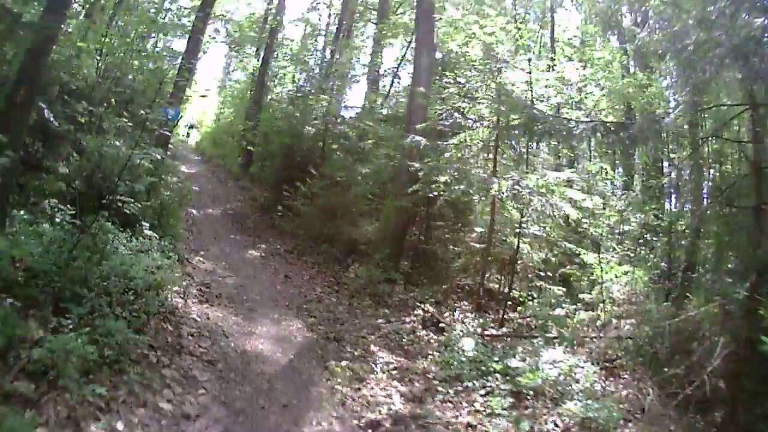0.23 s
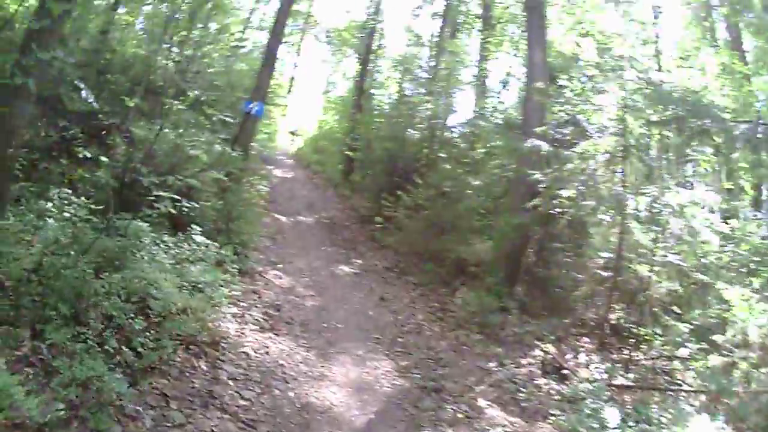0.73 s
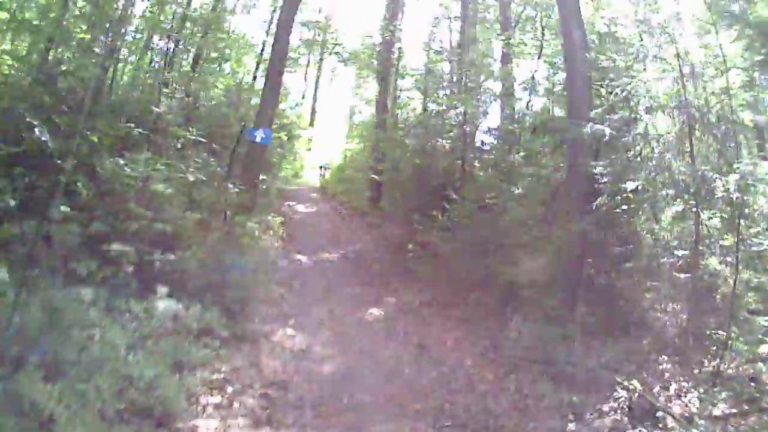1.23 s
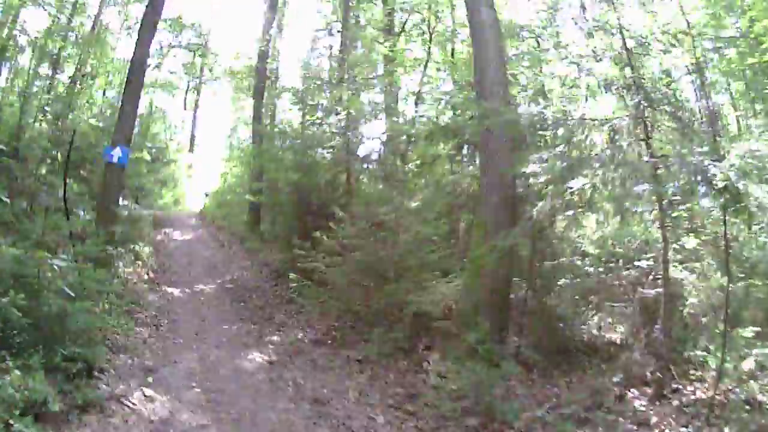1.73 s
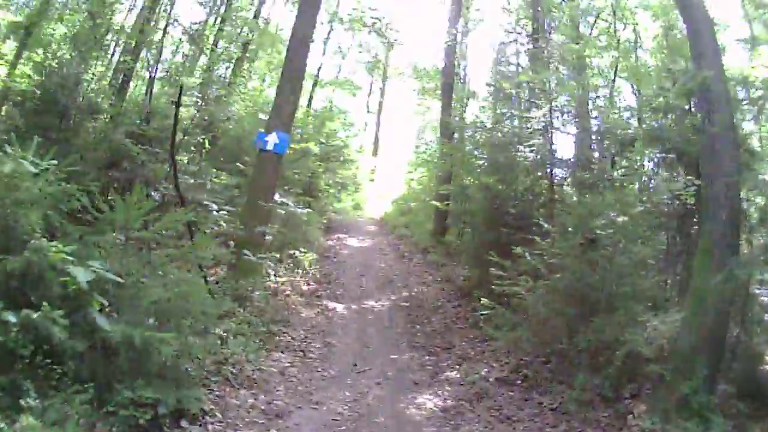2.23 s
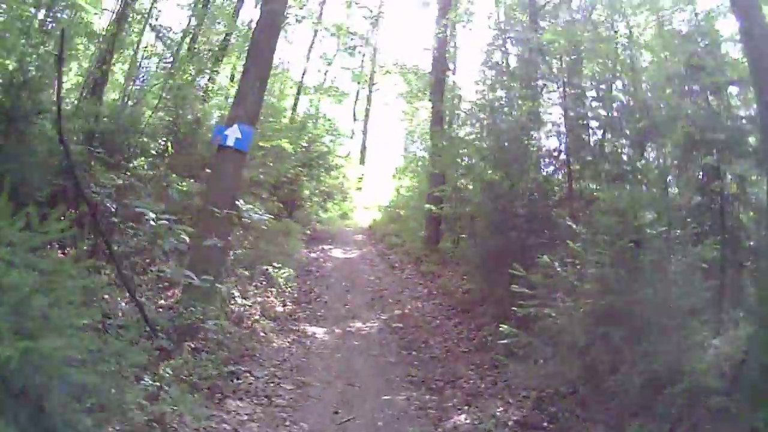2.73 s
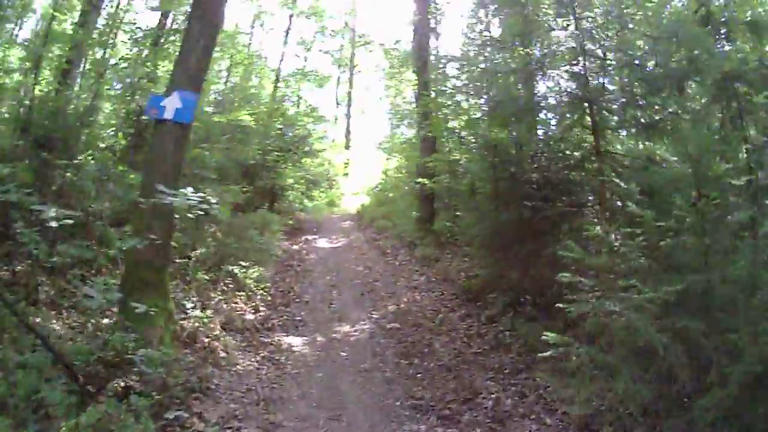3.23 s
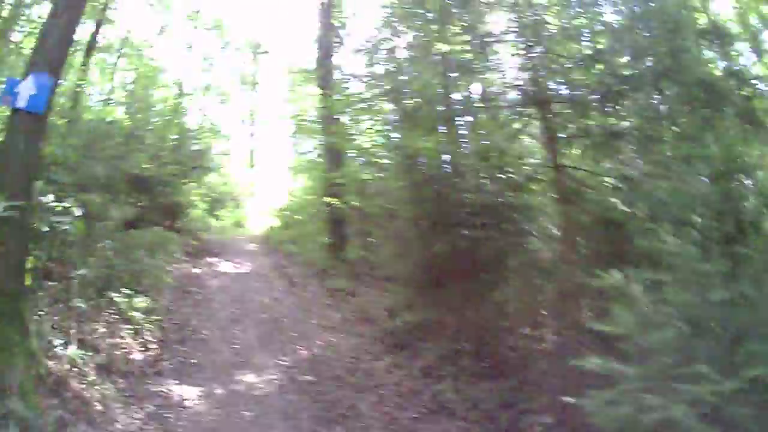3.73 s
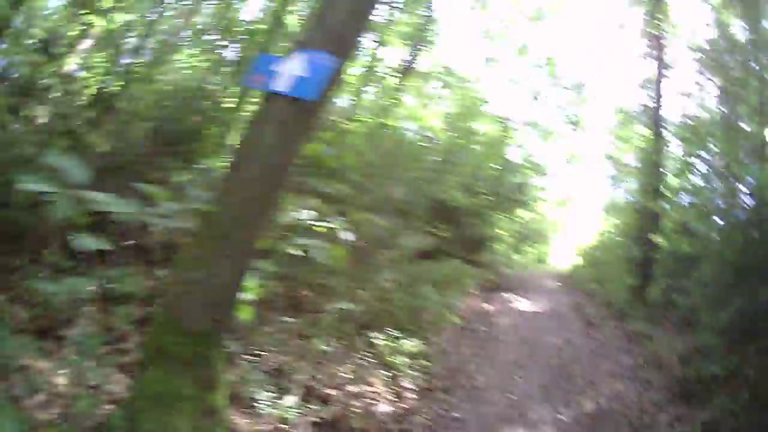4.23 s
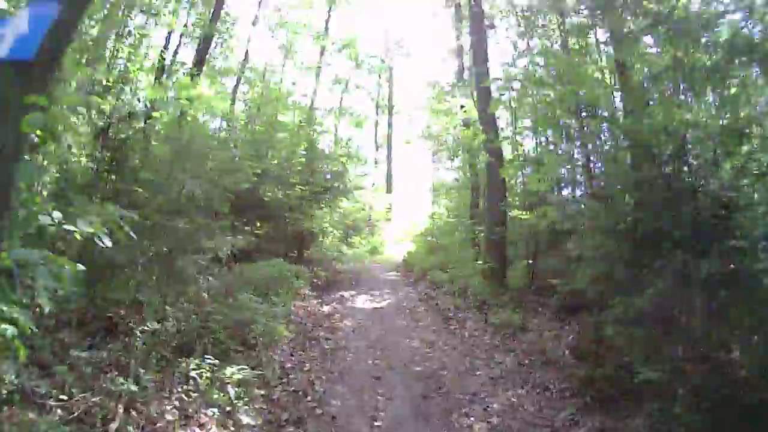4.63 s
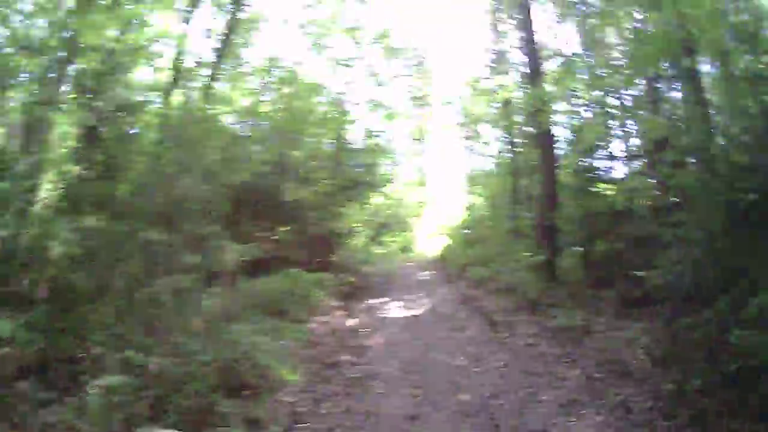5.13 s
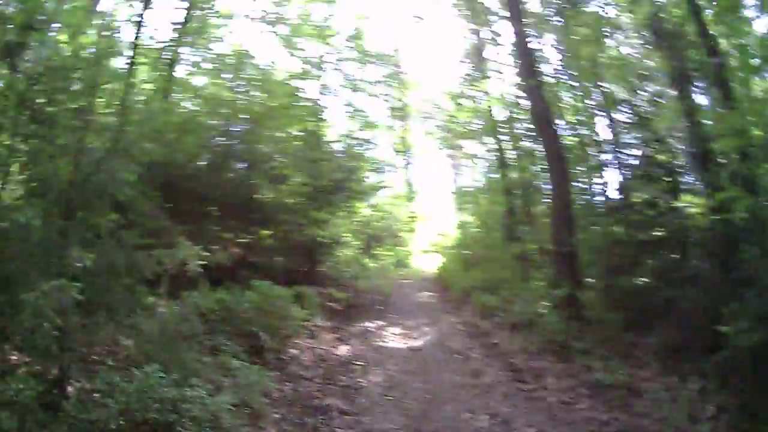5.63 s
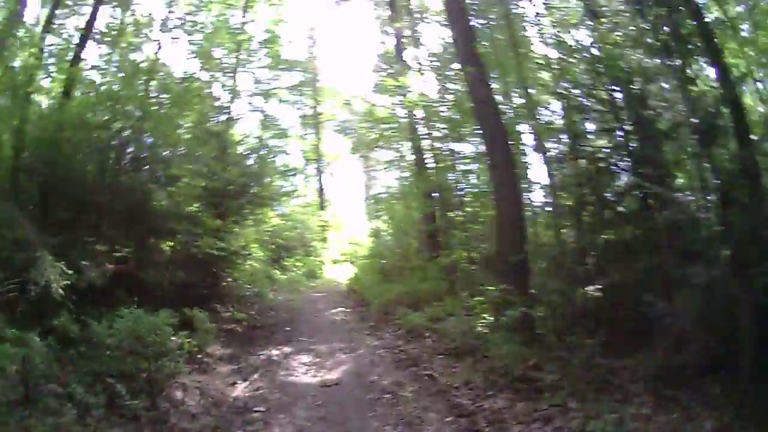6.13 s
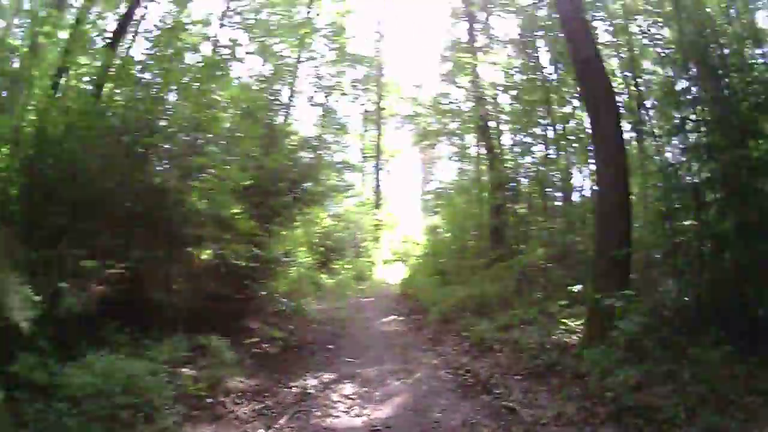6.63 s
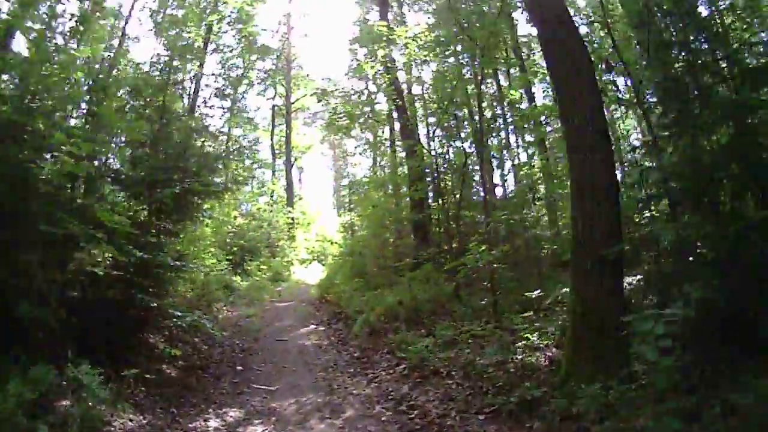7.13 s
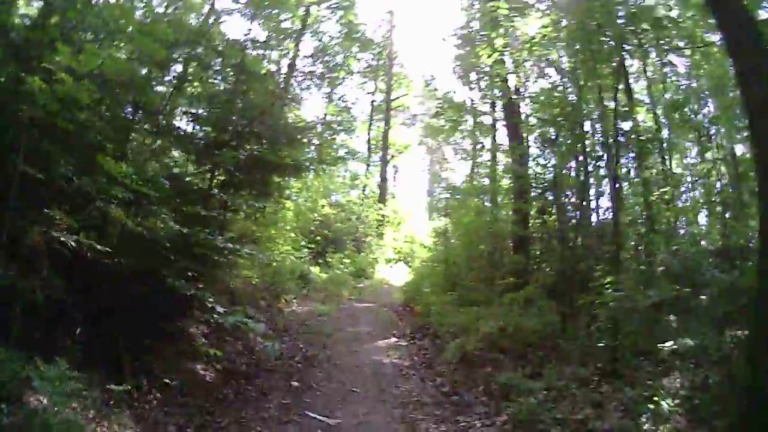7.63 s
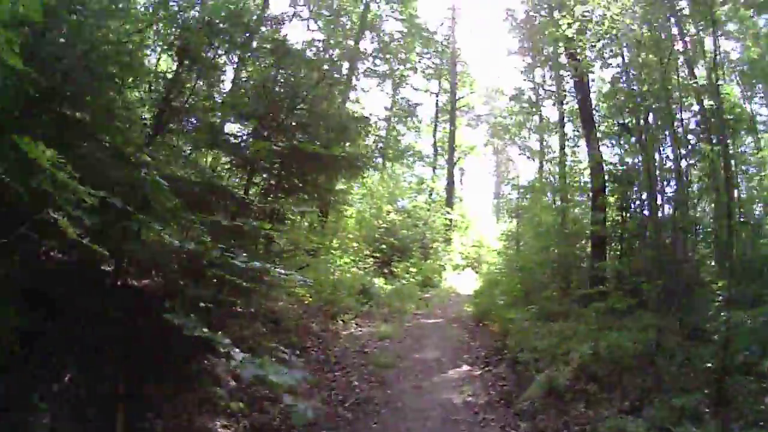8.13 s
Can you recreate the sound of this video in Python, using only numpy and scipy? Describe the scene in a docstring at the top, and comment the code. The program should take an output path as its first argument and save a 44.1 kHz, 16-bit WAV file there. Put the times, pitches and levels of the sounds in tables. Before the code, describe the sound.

Hollow, dry plastic knocks bounce in irregular clusters over a quiet bed of tyres drumming and crunching on forest dirt, with faint chain ticks and deep shudder. Midway the trail roughens: the handlebar thuds on one low note, the chain clacks against the frame and the tread whirs. Later the rattling thins out. The sound is close and dull inside a closed case on the bike, clipping on loud hits.

```python
"""A loose camera rattles in its mount at each bump, as a mountain bike rolls along a forest trail.
Each knock makes the camera case ring with short dying tones, then it bounces and knocks again.
On the roughest stretch the handlebar thuds on one low note, the chain slaps the frame and the tread hums.
Underneath, filtered noise makes the tyres drum and crunch, chain links tick and the bike shudders.
The closed case muffles it all, and the loudest blows overload the microphone."""
import sys
import numpy as np
from scipy import signal
from scipy.fft import rfft, irfft
from scipy.io import wavfile
from scipy.ndimage import uniform_filter1d

SR = 44100
rng = np.random.default_rng(int(sys.argv[2]) if len(sys.argv) > 2 else 0)


def write(x):
    x = np.atleast_2d(x).T
    wavfile.write(sys.argv[1], SR, np.round(np.clip(x, -1, 1) * 32767).astype(np.int16))


N = 369999
T = np.arange(N) / SR  # time of every sample, in seconds

# All table levels are relative: each source sets its own loudness further on.
# Bumps that set the camera chattering:
# (time [s], strength [dB], hardness as a tilt [dB per octave], loss per bounce [dB])
BUMPS = [(0.0153, -13, -4.5, 7.5), (0.1664, 0, 1.35, 9), (.2745, -14.5, 1, 0), (0.4907, -4.5, 0, 6),
         (.5661, -7.5, -0.5, 3), (0.597, -6.5, -0.5, 10.5), (0.9748, -9, -.5, 3), (1.0313, -10, -0.1, 3),
         (1.1692, -13.5, -.5, 3), (1.2167, -9.5, -1.5, 2.5), (1.2607, -8, -0.5, 3.5),
         (1.4066, -9.5, -0.5, 2), (1.4966, -5.5, 1, 4.5), (1.5987, 1, 3.5, 4), (1.6238, 0, 1, 10),
         (1.6525, -7.5, -0.5, 3), (1.7759, -.5, 1, 9), (1.8213, -12, 2, 13), (1.9301, -10, 1, 0.5),
         (2.255, -9.5, -1.7, 8.5), (2.572, -4, -1, 8), (3.0803, -8.5, 2.1, 3), (3.4767, -9.5, 0.5, 2.5),
         (3.5246, -7, 0.5, 12), (3.6353, -6, 2.7, 16), (4.3254, -4, 0.5, 9.5), (4.3606, -3, 3, 14),
         (4.3776, -3, 2, 5), (4.4353, -4, -0.5, 17), (4.458, -10, -2.5, 3.5), (4.522, -3.5, 1, 7),
         (4.8609, -9.5, -2, 8), (4.9589, -9, -1.25, 8.5), (5.2609, -8.5, 0, 5), (5.477, -13.5, -4.5, 9),
         (5.5223, -3, 0.5, 3.5), (5.5861, -6, 1, 4), (5.9794, -4, 0.14, 14), (6.0925, -11.5, -2.5, 7.5),
         (6.202, -13, -1.5, 9.5), (6.2429, -12, 1.5, 9.5), (6.8245, -11.5, 1, 14), (7.357, -19, -1.5, 10),
         (7.5529, -12.5, -1, 12), (7.5926, -3.5, 1.5, 10), (7.647, -12, -3, 6), (7.8165, -11, 0, 2.5),
         (8.3005, -11, -.5, 9.5)]
# Tones of the camera case: (pitch [Hz], level [dB], time to fade by 60 dB [s])
CASE_TONES = [(192, -15.5, 0.067), (272, 2, 0.028), (378.6, 0, 0.026), (629, -5, 0.027), (777, -4, 0.019),
              (915, -14.5, 0.022), (1437, -10, 0.03), (1649, -13.5, 0.025), (1980, -32, 0.026),
              (2725, -25.5, 0.02), (3310, -26.5, 0.017)]
# Jolts that shake the handlebar: (time [s], level [dB], rise time constant [s])
THUDS = [(2.864, -12.5, .003), (3.065, -8, .006), (3.0866, 3, 0.0072), (3.391, -7, .007),
         (3.4414, -2.5, .003), (3.5965, 12.5, 0.0028), (3.7503, 7.5, 0.0084), (3.9603, 7, 0.0053),
         (4.134, -6.5, .006), (4.155, -5, 0.0074), (4.3262, 1.5, 0.00084), (4.379, 1.5, 0.0035)]
# The chain slapping the frame: (time [s], level [dB], centre pitch of the blow [Hz])
CHAIN_SLAPS = [(.3735, -17.5, 1060), (.466, -18.5, 970), (1.958, -10.5, 900), (2.0115, -10.5, 1000),
               (2.6825, -15.5, 1470), (2.7872, 5, 1760), (3.1252, -5.5, 1520), (3.229, -14, 1300),
               (3.265, -22, 2200), (3.3172, 2, 1800), (3.4426, -8, 636), (3.5522, 6.5, 1390),
               (3.5605, -3.5, 1110), (3.5955, 6, 1200), (3.6145, 2, 910), (3.7495, 1, 830),
               (3.7895, -6, 583), (3.9565, 2, 850), (4.1275, -6.5, 1200), (4.1525, -10, 1320),
               (4.665, -7.5, 850), (4.847, -18, 1170), (6.4625, -18, 1207)]
# Tones of the bike frame: (pitch [Hz], level [dB], time to fade by 60 dB [s])
FRAME_TONES = [(440, -2, 0.083), (626, 2.5, .035), (715, 5, 0.047), (925, -2, 0.035), (1156, -5.5, 0.035),
               (1358, -2, 0.046), (1445, 1, 0.02), (1640, -14, 0.025), (2126, -7, 0.028),
               (2550, -9, 0.0063), (2734, -4.5, 0.033), (3250, -21.5, 0.034)]
# Thin metal parts that sing on: (time [s], pitch [Hz], level [dB], time to fade by 60 dB [s])
METAL_TONES = [(2.79, 3560, -54, 0.37), (3.125, 2840, -14, 0.029), (3.556, 3500, -46, 0.27),
               (3.6, 795, -19, 0.41), (3.601, 1298, -13.5, 0.3), (4.125, 2720, -31, 0.12)]
# Tyre knobs whirring under load, one list a stretch: (time [s], knob rate [per s], level [dB])
WHIRRS = [
    [(2.93, 113, -34.5), (3.0, 124, -29), (3.06, 146, -37), (3.11, 176, -16)],
    [(3.62, 160, -15), (3.7, 151, -25.5), (3.82, 138, -29), (3.93, 129, -25.5), (4.02, 100, -29),
     (4.1, 110, -48.5)],
]
# Hum tones of the tread: (multiple of the knob rate [-], level [dB])
KNOB_TONES = [(2, -10), (3, 2), (4, 5), (5, 1.5), (6, 2), (11, -16.5)]
# Tyres on dirt: (time [s], low drumming level [dB], gritty treble level [dB])
GROUND = [(0, -34, -43), (1.17, -39.5, -39), (1.6, -28.5, -38), (2.13, -39.5, -42), (2.9, -32.5, -39.5),
          (3.03, -24, -30.5), (3.15, -34, -39), (3.38, -29.5, -41), (3.66, -26, -32), (4.0, -31, -34.5),
          (4.28, -37, -41), (4.4, -26, -35.5), (4.7, -35.5, -41.5), (5.6, -30, -37), (6.65, -35.5, -40.5),
          (7.55, -29, -37), (7.7, -33, -41), (8.37, -33.5, -39)]
# Tone colour of the tyre noise: (pitch [Hz], level [dB per Hz])
TYRE_COLOUR = [(20, -9.5), (38, -8), (66, -15), (110, -2.5), (180, 3.5), (260, 1), (420, -6), (510, -10.5),
               (700, -7.5), (950, -19.5), (1600, -27.5), (1900, -40), (3400, -38), (4300, -46)]
# Resonances of the bike that carry tyre noise: (pitch [Hz], width [Hz], boost [dB])
BIKE_RESONANCES = [(246.5, 16, 12), (640, 91, 4), (1424.5, 90, 21), (2120, 43, 16.5), (2760, 140, 10)]

BOUNCE_S, BOUNCE_SCATTER = .0138, .07  # time between rebounds [s], and its spread [octaves]
SETTLED_DB = -15.5  # after the first rebound, weaker ones no longer lift the case
# Small bumps between the large ones; hardness in dB per octave
PEBBLES_PER_S, PEBBLE_DB, PEBBLE_SPREAD_DB, PEBBLE_HARDNESS = 5, -22.5, 4, -1.4
BAR_HZ, BAR_T60 = 243.2, 0.11  # the handlebar's note, and its time to fade by 60 dB [s]
LINKS_PER_S = 30
BUMP_DRUM_DB = -19.5  # extra drumming relative to the shaking
EDGE_HZ = 16300  # upper limit of the recorded band


def mount():
    """Every knock rings the loose case; harder contact brings out the higher tones."""
    out = np.zeros(N)
    hz = np.array(CASE_TONES)[:, 0]
    rise = 0.00078 + 0.097 / hz  # low tones take longer to get going
    knocks = [knock for bump in BUMPS for knock in chatter(*bump)]
    knocks += pebbles()
    for s, db, hardness in knocks:
        tilt_db = hardness * np.log2(hz / 600)
        knock = ring(CASE_TONES, tilt_db, rise, detune=0.028, scatter_db=2.07, size=2400)
        add(out, s, gain_of(db) * knock)
    return passed(gain_of(0.69) * out, 88, "high", order=2)


def chatter(s, db, hardness, loss_db, lead_db=-19, soften=0.58):
    """One bump: the case touches, knocks, then rebounds ever duller; gives (s, dB, hardness) rows."""
    gaps = BOUNCE_S * 2 ** (BOUNCE_SCATTER * rng.standard_normal(size=8))
    knocks = [(s - gaps[0], db + lead_db, hardness), (s, db, hardness)]
    for k, delay in enumerate(np.cumsum(gaps[1:]), 1):
        rebound_db = db - k * loss_db
        if k == 1 or rebound_db > SETTLED_DB:
            knocks.append((s + delay, rebound_db, hardness - k * soften))
    return knocks


def pebbles():
    """Small bumps knock the case once each, at uneven moments; gives (s, dB, hardness) rows."""
    slots = np.arange(0, N / SR, 1 / PEBBLES_PER_S)
    place, strength, colour = rng.standard_normal((len(slots), 3)).T
    times = abs(slots + .5 * place / PEBBLES_PER_S)
    levels = PEBBLE_DB + PEBBLE_SPREAD_DB * strength
    return list(zip(times, levels, PEBBLE_HARDNESS + 2 * colour))


def handlebar():
    """A jolt sets the bar swinging at its one low note."""
    out = np.zeros(N)
    for s, db, rise in THUDS:
        note = [(BAR_HZ, db, BAR_T60)]
        add(out, s, ring(note, 0, rise=rise, detune=0.006, scatter_db=1.77, size=9000))
    return gain_of(-1.0) * out


def chain_slap(choke_db_per_s=700):
    """Blows ring the frame, damped by the chain lying on it; a few thin metal parts sing on."""
    out = np.zeros(N)
    for s, db, centre_hz in CHAIN_SLAPS:
        blow = frame_blow(centre_hz, focus_db=8, rise=0.0012)
        add(out, s, blow * gain_of(db + 2 - choke_db_per_s * T[:len(blow)]))
    for s, *tone in METAL_TONES:
        add(out, s, ring([tone], 0, rise=0.003, detune=0, scatter_db=1, size=20000))
    return out


def frame_blow(centre_hz, focus_db, rise):
    """The frame is struck once, its tones favoured near the blow's centre pitch; peak 1."""
    octaves = np.log2(np.array(FRAME_TONES)[:, 0] / centre_hz)
    focus = -focus_db * octaves ** 2
    blow = ring(FRAME_TONES, focus, rise=rise, detune=0.016, scatter_db=3.5, size=3000)
    return blow / abs(blow).max()


def whirr(waver=0.033, flutter_db=6.0):
    """The tread hums on several multiples of the knob rate, wavering in pitch and strength."""
    out = np.zeros(N)
    for stretch in WHIRRS:
        s, knob_hz, db = np.transpose(stretch)
        t = np.arange(s[0], s[-1], 1 / SR)
        rate = np.interp(t, s, knob_hz) * (1 + waver * wander(size=500)[:len(t)])
        knobs_passed = np.cumsum(rate) / SR
        hum = np.zeros(len(t))
        for multiple, level in KNOB_TONES:
            strength = gain_of(level + flutter_db * wander(size=1200)[:len(t)])
            hum += strength * np.sin(2 * np.pi * (multiple * knobs_passed + rng.random()))
        fade = signal.windows.tukey(len(t), .1)  # soft start and end
        add(out, s[0], evened(hum) * gain_of(np.interp(t, s, db) + 1.0) * fade)
    return out


def rolling(shake, stones_per_s=220, spread_db=3, flutter_db=2.5, grit_flutter_db=2, ring_flutter_db=3.5):
    """Stones and fine crunch come through the bike, whose resonances each swell and fade."""
    hits = (rng.random(N) < stones_per_s / SR) * rng.choice([-1, 1], N)
    stones = hits * gain_of(spread_db * np.minimum(rng.exponential(1, N), 3))
    crunch = gain_of(-1) * rng.standard_normal(N)
    hz, db = np.transpose(TYRE_COLOUR)
    pitches = np.fft.rfftfreq(N, 1 / SR)
    colour = gain_of(np.interp(np.log(pitches + 1), np.log(hz), db))
    sound = irfft(rfft(evened(stones) + crunch) * colour, N)
    for hz, width, boost_db in BIKE_RESONANCES:
        swell = evened(gain_of(ring_flutter_db * np.minimum(wander(size=1500), 1.5)))
        resonance = signal.lfilter(*signal.iirpeak(hz, hz / width, SR), sound)
        sound = sound + (gain_of(boost_db) - 1) * swell * resonance
    drum_db, grit_db = ground(T)
    drumming = evened(passed(sound, 390, "low", order=3))
    drumming = drumming * (gain_of(drum_db) + gain_of(BUMP_DRUM_DB) * shake)
    grit = evened(passed(sound, 520, "high", order=3))
    grit = grit * gain_of(grit_db + grit_flutter_db * wander(size=900))
    return (drumming + grit) * gain_of(flutter_db * wander(size=2400) + 2.0)


def ground(s):
    """The dirt sets how strong the low drumming and the grit are at time s, in relative dB."""
    when, drum_db, grit_db = np.transpose(GROUND)
    return np.interp(s, when, drum_db), np.interp(s, when, grit_db)


def chain_links(spread_db=4.5, centre_hz=1330, over_bed_db=3.0):
    """Links slide softly onto the sprocket in a loose train, each ticking through the frame."""
    out = np.zeros(N)
    links = np.arange(1, N / SR * LINKS_PER_S)
    slack, strength, colour = rng.standard_normal((len(links), 3)).T
    times = (links + .2 * slack) / LINKS_PER_S
    grit_db = ground(times)[1]  # the ticks follow the level of the grit
    levels = grit_db + over_bed_db + spread_db * np.minimum(strength, 2)
    pitches = centre_hz * 2 ** (.5 * colour)
    for s, db, hz in zip(times, levels, pitches):
        add(out, s, gain_of(db) * frame_blow(hz, focus_db=7.5, rise=0.0027))
    return out


def rumble(shake):
    """The whole bike shudders at a very low pitch, more when the bumps shake it."""
    noise = passed(rng.standard_normal(N), 46, "low", order=4)
    deep = evened(passed(noise, 30, "high", order=2))
    return deep * (gain_of(-48) + gain_of(-23.5) * shake)


def ring(tones, weight_db, rise, detune, scatter_db, size):
    """One blow: dying tones, each a little different in pitch and strength every time."""
    hz, db, t60 = np.transpose(tones)[:, :, None]
    pitch, strength = rng.standard_normal((2, len(hz), 1))
    t = np.arange(size) / SR
    weight = np.reshape(weight_db, (-1, 1))
    level = gain_of(db + weight + scatter_db * strength - 60 * t / t60)
    onset = 1 - np.exp(-t / np.reshape(rise, (-1, 1)))
    waves = np.sin(2 * np.pi * hz * (1 + detune * pitch) * t)
    return (level * onset * waves).sum(0)


def wander(size):
    """Smooth chance of rms 1 that changes over about size samples."""
    return evened(signal.oaconvolve(rng.standard_normal(N), np.hanning(size), "same"))


def passed(x, hz, kind, order):
    """Keeps what lies below ("low") or above ("high") a pitch."""
    sections = signal.butter(order, min(hz, SR / 2.1), kind, fs=SR, output="sos")
    return signal.sosfilt(sections, x)


def evened(x):
    """Scales to rms 1, so that a later gain sets the loudness."""
    return x / np.sqrt(np.mean(x ** 2) + 1e-20)


def gain_of(db):
    """Turns decibels into a factor."""
    return 10 ** (np.asarray(db) / 20)


def add(mix, s, sound):
    """Mixes a sound in at time s, cutting off what runs past the end."""
    part = mix[max(round(s * SR), 0):][:len(sound)]
    part += sound[:len(part)]


def scene():
    """Everything arrives through the bike and the camera's shell, and adds up."""
    knocks = mount()
    shake = np.sqrt(abs(uniform_filter1d(knocks ** 2, size=4000)))  # how hard the bumps shake the bike
    blows = knocks + handlebar() + chain_slap()
    background = whirr() + rolling(shake) + chain_links() + rumble(shake)
    return (blows + background)[None]


def record(dry):
    """The closed case muffles the treble, the input clips hard, then the band is limited."""
    muffled = passed(dry, 3800, "low", order=14)
    ceiling = .71
    clipped = np.clip(muffled, -ceiling, ceiling)
    band_limit = signal.firwin(511, EDGE_HZ, window=("kaiser", 9), fs=SR)
    return signal.oaconvolve(clipped, band_limit[None], "same")


dry = scene()
out = record(dry)
write(out)
```